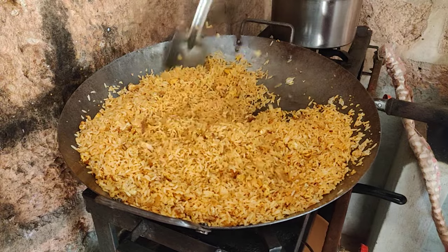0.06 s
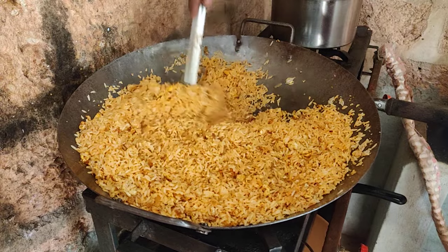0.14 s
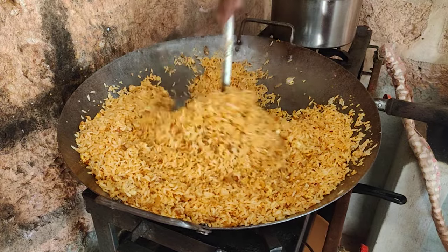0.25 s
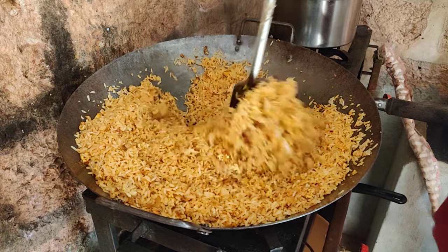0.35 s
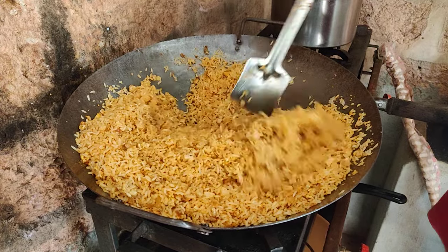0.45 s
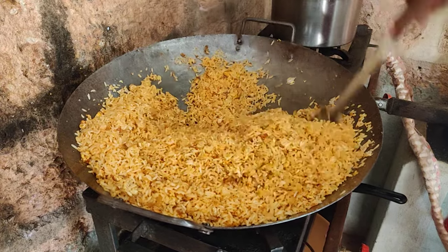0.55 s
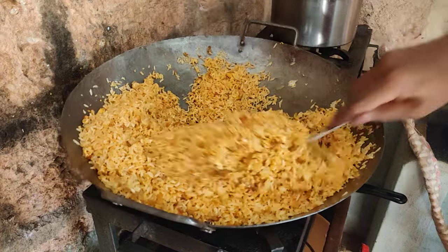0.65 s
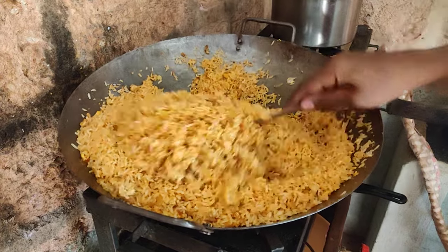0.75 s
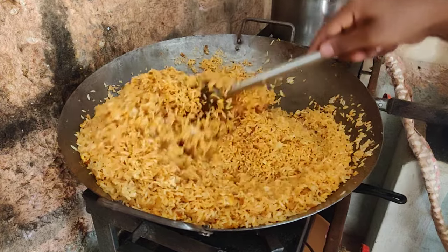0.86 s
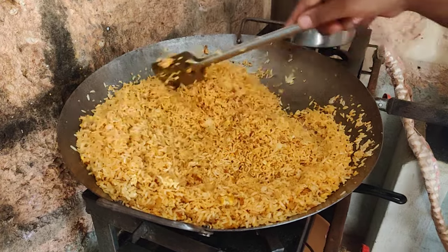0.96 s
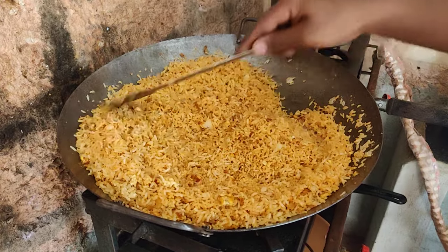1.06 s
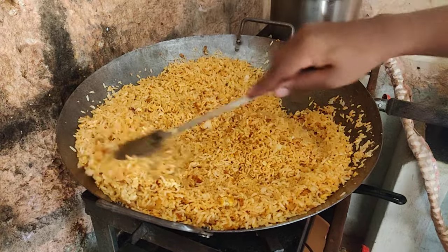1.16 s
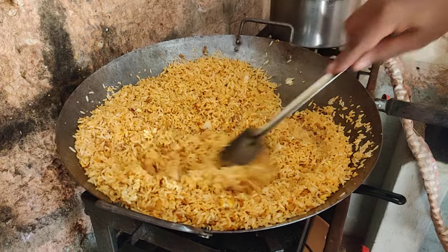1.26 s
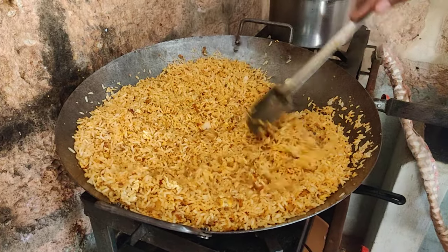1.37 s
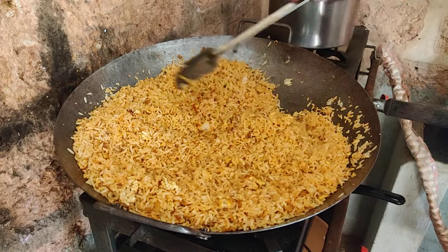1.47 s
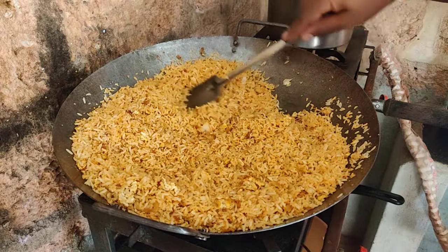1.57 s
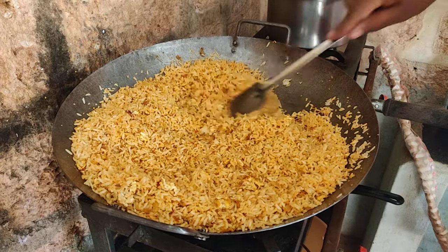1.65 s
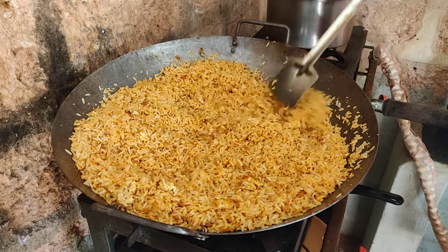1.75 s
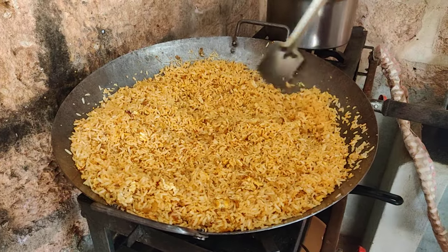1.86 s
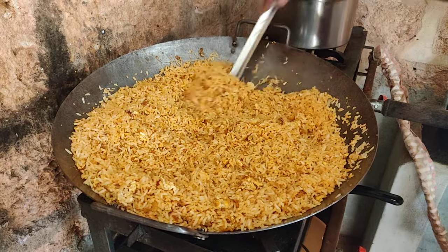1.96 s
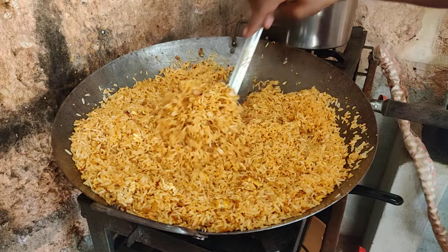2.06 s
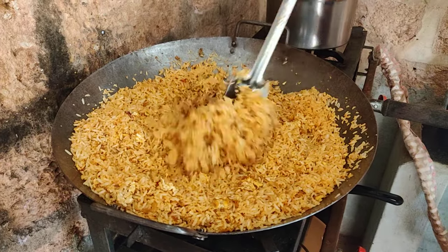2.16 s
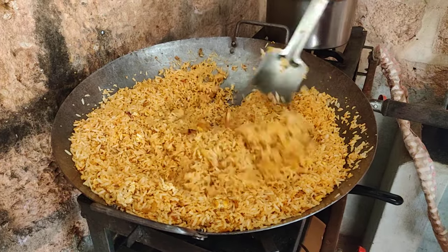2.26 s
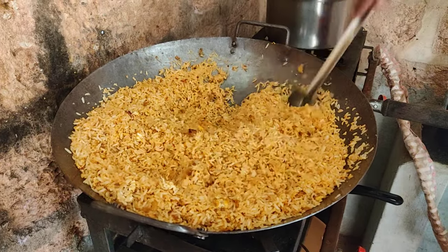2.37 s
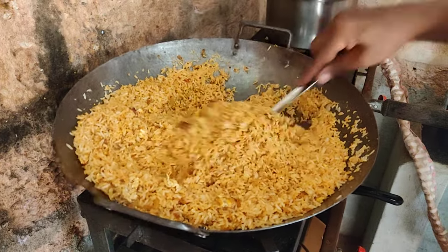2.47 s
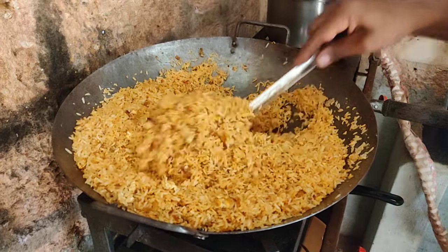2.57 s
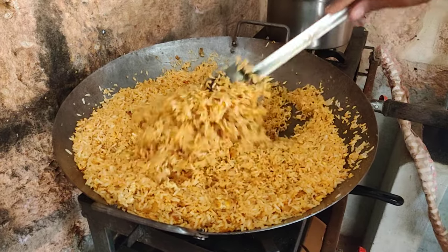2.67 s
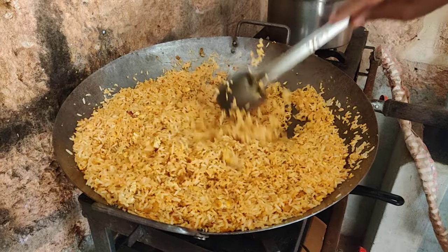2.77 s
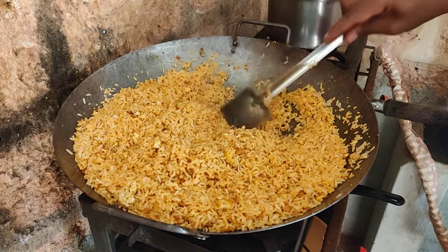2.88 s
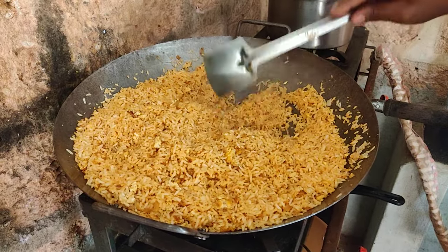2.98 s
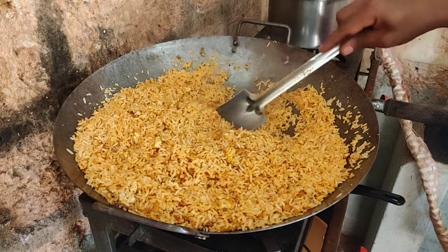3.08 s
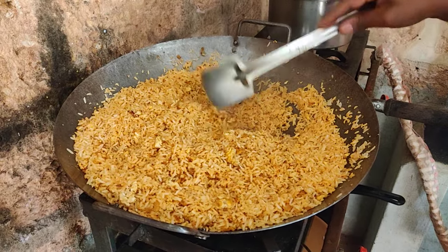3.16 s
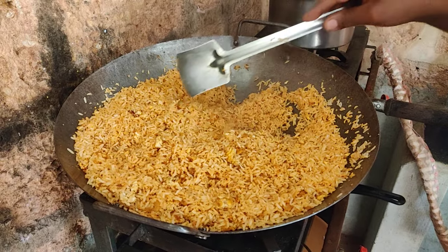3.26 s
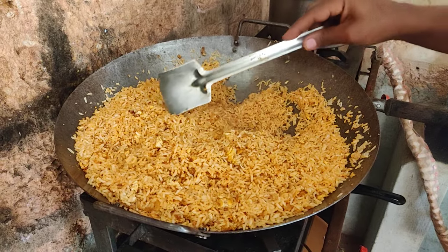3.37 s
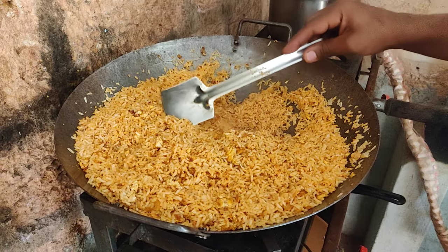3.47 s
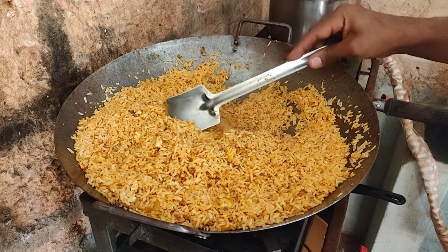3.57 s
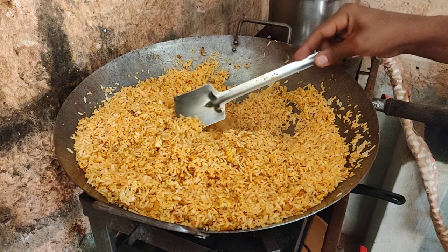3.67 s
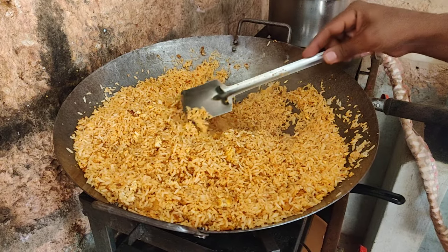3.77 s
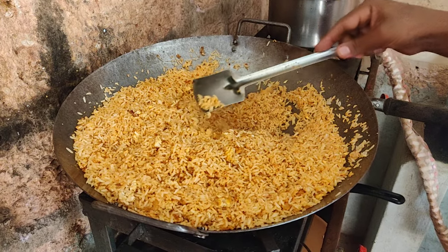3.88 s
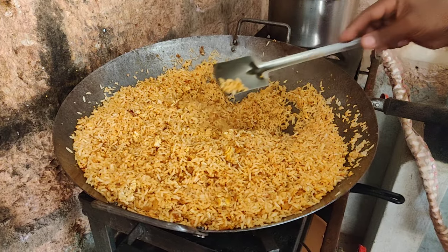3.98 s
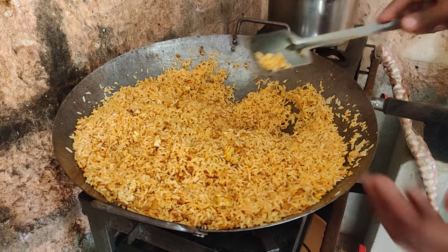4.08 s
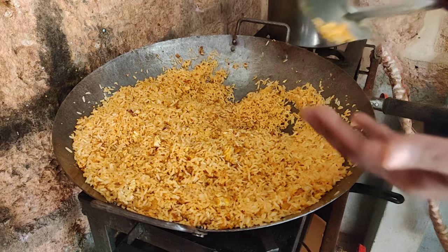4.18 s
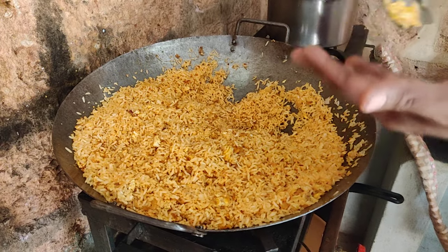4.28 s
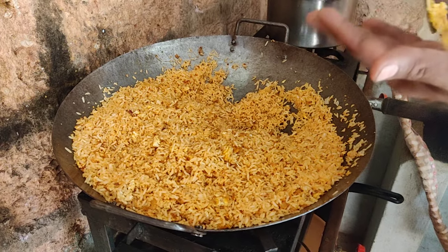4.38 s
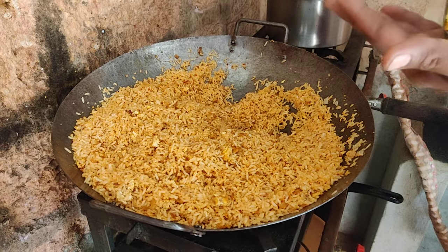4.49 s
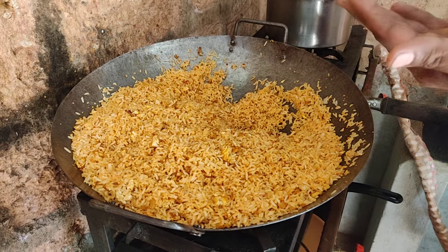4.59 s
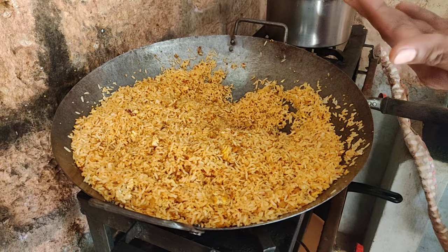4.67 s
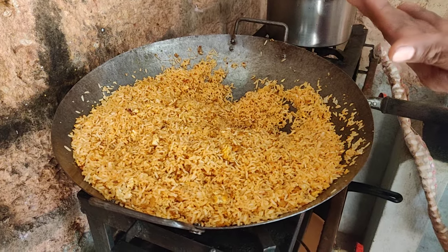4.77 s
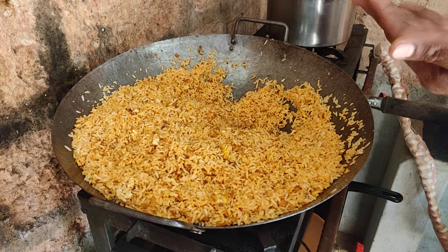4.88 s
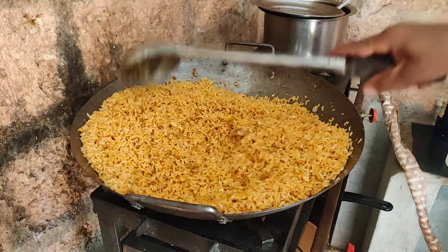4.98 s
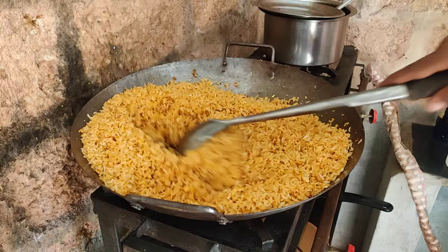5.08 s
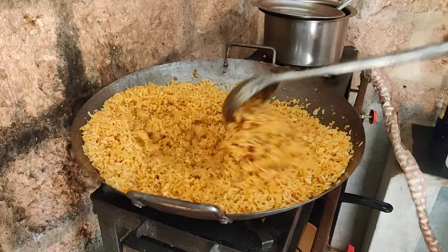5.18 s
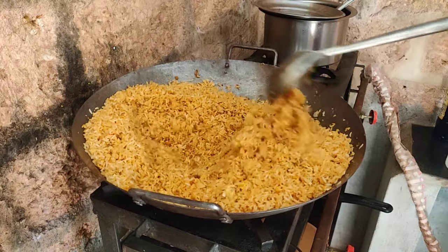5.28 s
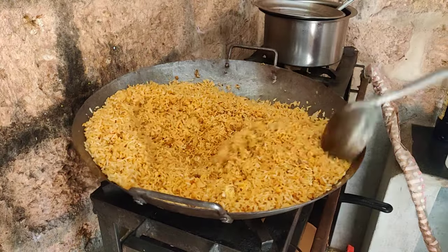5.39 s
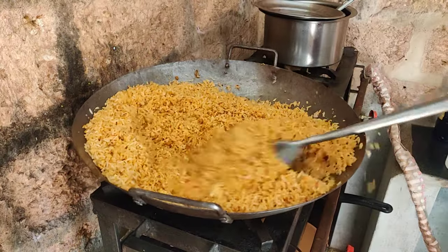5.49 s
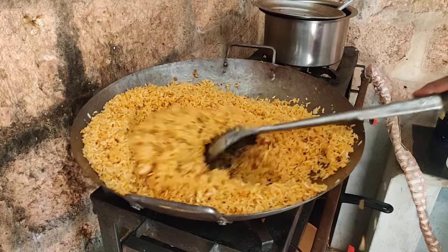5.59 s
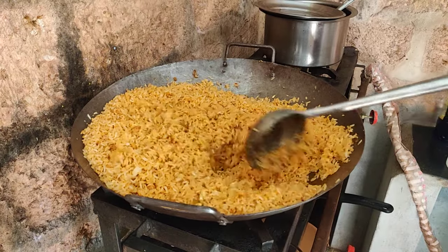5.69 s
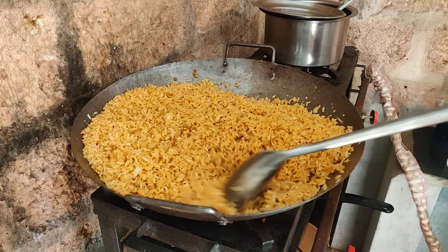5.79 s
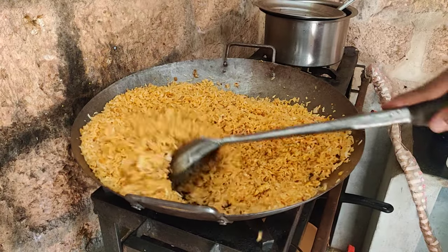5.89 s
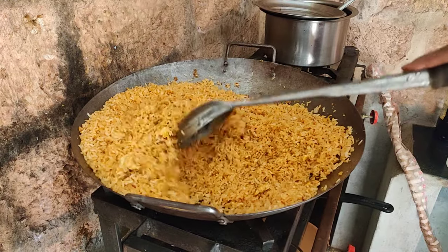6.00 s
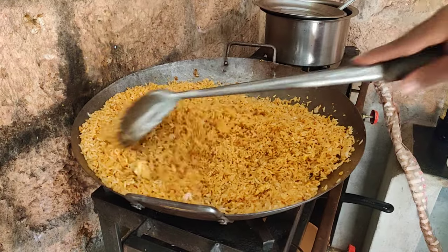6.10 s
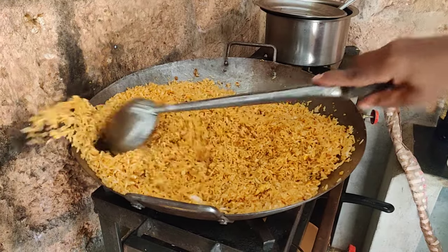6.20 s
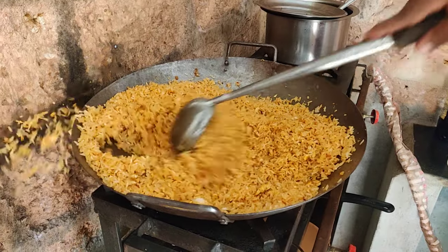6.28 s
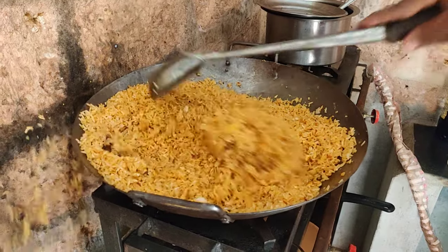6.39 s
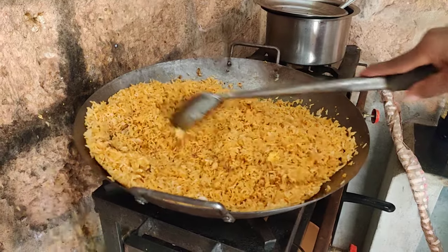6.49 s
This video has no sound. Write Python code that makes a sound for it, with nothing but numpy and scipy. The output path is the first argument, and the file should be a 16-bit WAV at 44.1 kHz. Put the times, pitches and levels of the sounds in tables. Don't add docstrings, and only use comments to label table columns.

```python
import sys
import numpy as np
from scipy import signal
from scipy.fft import rfft, irfft, dct, next_fast_len
from scipy.io import wavfile
from scipy.ndimage import uniform_filter1d

SR = 44100
rng = np.random.default_rng(int(sys.argv[2]) if len(sys.argv) > 2 else 0)


def ratio_of_db(decibels):
    return 10 ** (np.asarray(decibels, float) / 20)


def generate_wav(signal):
    frames = np.transpose(np.atleast_2d(signal))
    scaled = np.clip(frames, -1, 1) * 32767
    pcm = np.round(scaled).astype(np.int16)
    wavfile.write(sys.argv[1], SR, pcm)


N = 288582
TIME = np.arange(N) / SR
FAST = next_fast_len(N)
CUT_S = 4.744

# [pitch_hz, level_db, t60_s]
BOOM_FAR = [(110.3, 0.5, 0.45), (206.9, -1, 0.33), (246.7, -0.5, 0.19), (274, -6, 0.48),
            (289.3, 1.5, 0.092), (412, -15.5, 0.33)]
BOOM_NEAR = [(108.6, -1.5, 0.4), (156, -29, 0.067), (209.3, -3.5, 0.21), (240.3, 3, 0.077),
             (272.7, -0.5, 0.14), (296.4, -3.5, 0.16), (406, -15, 0.38)]
# [pitch_hz, level_db, t60_s]
BODY = [(567, -11, .07), (657, -7, .07), (727, -12, .06), (815, -10, .06), (880, -12, .05),
        (1040, -13, .05)]
# [start_s, pitch_hz, level_db, t60_s]
BLOW_TONES = [(.66, 129, -19.5, 2.1), (2.45, 129, -38, 1), (5.23, 1583, -32, .66), (5.23, 1879, -27, .6),
                  (5.23, 2379, -32, .28), (5.23, 2875, -24, .15), (5.23, 3270, -20, .12), (5.23, 1179, -38, .4),
                  (5.613, 1100, -3, .09), (5.613, 1270, -13, .14), (5.613, 2159, -22, .18), (5.613, 1028, -20, .25),
                  (5.7, 410, -38, 1), (5.7, 240, -36, 1), (6.017, 1583, -33, .6), (6.305, 2450, -24, .15),
                  (.503, 700, -25, .12), (.58, 660, -14, .15), (.58, 860, -19, .12), (.614, 650, -16, .15),
              (.738, 670, -20, .12), (.792, 800, -30, .1), (2.311, 720, -18, .09), (2.394, 670, -14, .12),
              (2.438, 650, -13, .11), (2.55, 800, -27, .1), (2.612, 700, -30, .1), (2.68, 690, -16, .1),
              (4.796, 800, -32, .1), (4.871, 900, -22, .12), (5.103, 750, -24, .15), (5.181, 700, -34, .1),
              (5.324, 640, -15, .15), (5.358, 590, -20, .25), (5.457, 780, -26, .12), (5.494, 880, -23, .1),
              (6.065, 800, -27, .12), (6.326, 800, -18, .12), (6.357, 740, -22, .12), (6.39, 275, -18, .7),
              (.76, 290, -22, .4), (5.635, 400, -18, .25), (5.7, 204, -27, .6), (6.45, 390, -28, .2),
              (6.025, 350, -17, .2), (6.306, 412, -16, .25), (2.7, 400, -26, .2), (6.32, 108, -14, .7),
              (6.07, 105, -20, .4), (6.04, 200, -24, .3), (6.306, 620, -21, .15), (5.23, 760, -20, .14),
              (5.292, 990, -19, .1), (5.25, 1170, -22, .08), (6.305, 2520, -21, .06), (4.871, 2450, -23, .05)]
# [start_s, clank_db, boom_db, body_db, blade_ring_db]
BLOWS_FAR = [(0.3935, -5.5, -23, -34, 7), (0.5042, -39, -28, -21, -14), (0.579, -22.5, -19, -21.5, -6),
             (0.6497, -35, -15, -12.5, 6), (0.705, -29, -26, -31, 2), (0.7388, -35, -35, -25.5, -11),
             (0.8004, -24, -44, -25, -27), (1.4525, -25, -58, -35, -12), (1.729, -23.5, -35, -49, -24),
             (1.821, -19.5, -57, -59, 8), (1.8575, -26, -50, -40, -5), (1.8839, -36, -34.5, -32, -6),
             (2.203, -28, -50, -61, 9), (2.232, -34, -46, -60, 8), (2.2731, -20, -39, -28.5, 9.5),
             (2.3112, -25.5, -31, -19.5, 6), (2.3291, -26.5, -18, -23, 6), (2.395, -17, -18, -23, -12.5),
             (2.438, -30, -18, -28, -2), (2.55, -30, -19.5, -34, -7), (2.68, -3, -17, -8.5, 4.5),
             (2.9016, -3, -18.5, -14.5, 1.5)]
BLOWS_NEAR = [(4.871, -4.5, -8, -19.5, -18), (5.1032, -31.5, -29, -27.5, -19), (5.2297, -5, -24.5, -9.5, 2),
              (5.291, -13, -37, -26, -32), (5.326, -18, -32, -28, -10), (5.454, -51, -51, -41, -8),
              (5.495, -31, -24, -26, -5.5), (5.6135, -3.5, -12.5, -7, -6), (6.017, -18, -27, -24, -17),
              (6.065, -41, -46, -35, -15), (6.305, -6, -8.5, -24, -4.5), (6.3629, -26, -17.5, -22, -3)]
BLOWS = np.array(BLOWS_FAR + BLOWS_NEAR)
# [start_s, hold_s, boom_db, body_db, pitch_hz]
HEAVES = [(-.04, 0.034, -34, -55, 1120), (0.493, 0.029, -23, -41, 680), (0.569, 0.063, -11.5, -28.5, 650),
          (0.727, 0.17, -34.5, -48.5, 656), (1.105, 0.041, -38, -47, 830), (1.775, 0.2, -36.5, -52, 910),
          (2.298, 0.084, -14.5, -32, 696), (2.412, 0.027, -14.5, -31, 664), (2.507, 0.039, -19, -37, 727),
          (2.692, 0.064, -35, -41.5, 680), (2.909, 0.052, -31.5, -45.5, 770), (4.716, 0.14, -26, -37, 960),
          (4.864, 0.068, -20, -41, 980), (5.096, 0.016, -16.5, -40, 706), (5.229, 0.019, -12, -23.5, 1200),
          (5.306, 0.059, -26, -36.5, 870), (5.43, 0.1, -16, -38, 848), (5.601, 0.033, -17.5, -32, 990),
          (5.77, 0.2, -34.5, -71, 750), (6.005, 0.049, -17, -36, 830), (6.304, 0.015, -11.5, -23, 836),
          (6.45, .1, -30, -58, 745)]
# [level_against_blow_db, fall_db_per_s]
JUDDER = [
    (2.5, 187),
    (-13, 372),
    (-1.5, 902),
]
# [start_s, length_s, from_hz, to_hz, level_db]
SCOOPS = [
    (5.24, 0.134, 1370, 520, -25),
    (5.235, 0.156, 2160, 700, -28),
    (5.63, 0.12, 1290, 900, -31),
    (4.9, 0.06, 790, 930, -35),
    (1.87, 0.13, 820, 580, -41.5),
]
# [start_s, length_s, pitch_hz, level_db]
HUMS = [(.402, 0.025, 242, -21.5), (.568, 0.0098, 226, -15), (.641, 0.038, 231, -10),
        (.694, 0.023, 266.6, -9.5), (.755, .03, 270, -24), (2.333, .013, 247, -12), (2.372, .011, 262, -17),
        (2.403, .009, 253, -14), (2.432, 0.014, 265, -10), (2.454, .014, 228, -8), (2.482, 0.008, 245, -14),
        (2.507, .007, 222, -13), (2.558, 0.012, 216, -13), (2.574, .011, 228, -14), (2.609, .008, 252, -20),
        (2.691, 0.012, 236, -18), (2.715, 0.0093, 246, -18.5), (2.901, 0.025, 233, -19.5),
        (2.937, 0.0064, 258, -17), (4.87, .023, 243, -10), (4.902, .01, 249, -12), (4.922, 0.01, 253, -16),
        (5.238, 0.01, 225, -14), (5.27, 0.019, 228, -19), (5.305, 0.038, 250, -19), (5.491, 0.02, 229, -22),
        (5.557, .01, 242, -19), (5.622, .028, 216, -11), (6.068, 0.019, 230, -19.5),
        (6.306, 0.039, 256.5, -4.5), (6.364, 0.022, 265, -3.5), (6.394, 0.006, 264, -12),
        (6.411, 0.0065, 247, -16), (0.782, .008, 257, -19), (5.113, 0.027, 246, -22.5),
        (5.361, .01, 268, -22), (6.098, 0.063, 203.5, -25.5), (4.89, .09, 81, -23), (6.039, .08, 81.8, -29),
        (6.339, .12, 81.4, -22.5)]
# [start_s, pitch_hz, level_db]
CRACKS = [(0.579, 900, -16), (.739, 920, -29), (2.3112, 900, -13), (2.395, 900, -12), (2.44, 800, -17),
          (2.68, 1200, -11), (4.8707, 1300, -19), (5.103, 990, -26), (5.2293, 1260, -1),
          (5.6127, 1160, -3.5), (6.3046, 980, -9)]
# [pitch_hz, level_db, t60_s]
BLADE = [(3190, -3, .09), (3285, 0, .1), (3431, 0, .1), (3540, -1, .08), (3655, 1, .11), (3770, 0, .09),
         (3870, -3, .08), (4270, -10, .04), (5900, -10, .04)]
# [pitch_hz, level_db_per_hz]
CLANK = [(400, -6.5), (900, -3.5), (1300, 2), (2000, -14.5), (2650, -13.5), (3300, 9), (3950, 7),
         (4600, 2.5), (6600, -2), (7950, -13), (15200, -40), (15900, -22), (16500, -54)]
# [start_s, hold_s, level_db]
SCRAPES = [(-.04, 0.083, -24), (0.134, 0.035, -35.5), (0.382, 0.18, -22), (0.663, 0.027, -43),
           (1.0, 0.24, -46), (1.445, 0.48, -51), (1.797, 0.04, -23.5), (2.092, 0.14, -54.5),
           (2.243, 0.031, -20), (2.41, 0.1, -35), (2.68, 0.0044, -23.5), (2.908, 0.055, -33.5),
           (4.71, 0.26, -31), (5.02, 0.19, -38.5), (5.276, 0.065, -19), (5.42, 0.16, -34),
           (5.63, 0.26, -33), (6, 0.12, -27), (6.288, 0.042, -20.5), (6.452, .1, -45)]
# [pitch_hz, level_db_per_hz]
SCRAPE = [(710, -55), (1200, -13), (1900, -17), (2080, -11.5), (3750, -3), (5100, -8.5), (5630, -6),
          (8360, -25.5), (15300, -20), (16000, -12), (16500, -41)]
# [time_s, level_db]
SIZZLE = [(0, -35), (.16, -41), (.57, -36), (.85, -38.5), (1.4, -40.5), (1.56, -39.5), (1.76, -45),
          (2.4, -37.5), (2.6, -35), (2.852, -44.5), (3.85, -44), (4.73, -45), (4.75, -36), (5.1, -39),
          (6.2, -38), (6.54, -42)]
# [start_s, level_db]
SPITS = [(0.164, -17.5), (0.955, -20.5), (1.1187, -25), (1.385, -38), (1.774, -16), (1.857, -13),
         (1.97, -20.5), (2.066, -19), (2.148, -27), (2.129, -24), (3.213, -28), (3.236, -32), (3.4, -25),
         (3.485, -27.5), (3.523, -21), (3.6242, -46), (3.7577, -23.5), (3.778, -20.5), (3.8387, -21),
         (3.9277, -21.5), (3.985, -28), (4.021, -22), (4.0549, -15), (4.1, -22.5), (4.247, -17.5),
         (4.3231, -18.5), (4.497, -20.5), (4.5355, -16), (4.637, -20), (4.6636, -24), (5.89, -17.5),
         (6.465, -32)]
# [pitch_hz, level_db]
SPIT_TILT = [(300, -5.5), (1000, 2), (6000, -0.5), (9000, -4), (16000, -5)]
# [pitch_hz, level_db_per_hz]
FRY = [(88, -18), (150, -7), (227, -9), (409, -8.5), (434, -12), (460, -9), (864, -7), (1410, -9.5),
       (3230, -6.5), (3560, -8), (5930, -11.5), (8130, -22), (15300, -19.5), (16500, -4.5)]
# [pitch_hz, likeness_share]
FRY_SAME = [(60, 0.31), (180, 0.8), (550, 0.74), (1650, 0.3), (4970, -0.12), (15000, -0.11)]
# [pitch_hz, balance_db]
FRY_LEAN = [(60, 11), (95, 26), (150, -2), (240, 1), (380, 0), (600, 3), (950, -1), (1500, 5.5), (2380, 3),
            (3770, 0), (5980, 26), (9470, -1.5), (15000, 6.5)]
# [start_s, level_db, contact_s]
TAPS = [
    (4.574, -22.5, 0.0007),
    (4.683, -5.5, 0.00025),
]
# [pitch_hz, level_db, t60_s]
DRONE_FAR = [(69, -19, 0.049), (85.5, 4, 0.14), (117.2, 1.5, 0.31)]
DRONE_NEAR = [(82, -1.1, 0.83), (115.7, 0.44, 0.55), (137.1, 0.63, 0.47)]
# [far_db, near_db]
DRONE_REST = (-56.5, -35.5)
DEEP_REST = (-56, -59)
DRONE_SHAKE = (-10.5, -12.5)
DEEP_SHAKE = (-44, -48)
# [multiple, level_db]
IDLE = [(1, -36), (2, -33), (4, -31.5), (5, -38), (6, -35)]
# [pitch_hz, balance_db]
LEAN_FAR = [(60, 8), (95, 1), (150, 2.5), (240, 1), (380, -1), (600, 0.5), (950, -1), (1500, 3.5),
            (2380, -2), (4400, 4.5), (6200, 12), (9470, 0), (15000, 2.5)]
LEAN_NEAR = [(60, 5), (95, 0), (150, 5), (240, -0.5), (380, 0), (600, -0.5), (950, -0.5), (1500, 1.5),
             (2380, -2.5), (4600, 0), (6500, 12), (9470, -4), (15000, 1.5)]
# [pitch_hz, share_of_neighbouring_power]
GATE = [(1500, 0), (2200, .42), (3000, .5), (4500, .4), (6000, .28), (7200, .4), (8400, .64), (9600, .77),
        (13500, .68), (15500, .6)]


def pan():
    push = force(column=1, modes=BOOM_NEAR, knock_db=-5.0, rub_db=-8.0, rattle_t60=0.2, fall_db=129)
    boom = np.where(TIME < CUT_S, ring(push, BOOM_FAR), ring(push * (TIME > CUT_S), BOOM_NEAR))
    stir = force(column=2, modes=BODY, knock_db=-11.5, rub_db=-11, rattle_t60=0.2, fall_db=146)
    end_hz, sink_s, width_hz = 620, 0.05, 200
    current = np.searchsorted([row[0] for row in HEAVES], TIME) - 1
    start, _, _, _, first_hz = np.transpose(HEAVES)[:, current]
    sinking = end_hz + (first_hz - end_hz) * np.exp(-((TIME - start) / sink_s) ** 2)
    turn = np.exp(2j * np.pi * np.cumsum(sinking) / SR)
    r = np.exp(-np.pi * width_hz / SR)
    hollow = (turn * signal.lfilter([1], [1, -r], stir / turn)).real
    out = boom + ring(stir, BODY) + ratio_of_db(15) * hollow + ratio_of_db(21) * band(stir, 450, 2000)
    t = TIME[:2 * SR]
    for s, hz, db, t60 in BLOW_TONES:
        onset = 1 - np.exp(-t * hz / 2)
        add(out, s, ratio_of_db(db - 60 * t / t60) * np.sin(2 * np.pi * hz * t) * onset)
    return band(out, 150, 5700)


def force(column, modes, knock_db, rub_db, rattle_t60, fall_db):
    rub = rng.standard_normal(N) * lumps(per_s=80, db=2.5)
    effort = heave(column + 1, fall_db) + judder(column - 1, column + 1)
    rub *= effort * ratio_of_db(rub_db) / ring(rub, modes).std()
    t = TIME[:3000]
    for row, shake in zip(BLOWS, rng.standard_normal((len(BLOWS), len(t)))):
        knock = (t == 0) + 0.041 * shake * ratio_of_db(-60 * t / rattle_t60)
        add(rub, row[0], ratio_of_db(row[column + 1] + knock_db) * knock)
    return rub


def heave(column, fall_db):
    rows = np.transpose(HEAVES)
    return strokes(rows[0], rows[1], rows[column], 0.033, fall_db)


def judder(layer, column):
    db, fall_db = JUDDER[layer]
    return strokes(BLOWS[:, 0], 0, BLOWS[:, column] + db, 1 / 1000, fall_db)


def strokes(start, hold, db, rise_s, fall_db):
    t = TIME[::32]
    since = t - np.reshape(start, (-1, 1))
    end = rise_s + abs(np.reshape(hold, (-1, 1)))
    release = ratio_of_db(np.reshape(db, (-1, 1)) - fall_db * np.maximum(since - end, 0))
    shape = np.clip(since / rise_s, 0, 1) * release
    same_view = (t > CUT_S) == (t - since + end > CUT_S)
    return np.interp(TIME, t, (shape * same_view).sum(0))


def scoops():
    out = np.zeros(N)
    rub = rng.standard_normal(N) * lumps(per_s=70, db=1.5)
    width_hz = 110
    r = np.exp(-np.pi * width_hz / SR)
    for s, length, from_hz, to_hz, db in SCOOPS:
        u = TIME[:round(length * SR)] / length
        sliding = to_hz + (from_hz - to_hz) * (1 - u) ** 1.33
        turn = np.exp(2j * np.pi * np.cumsum(sliding) / SR)
        piece = rub[round(s * SR):][:len(u)]
        tone = (turn * signal.lfilter([1], [1, -r], piece / turn)).real
        add(out, s, ratio_of_db(db) * np.sqrt(np.sin(np.pi * u)) * evened(tone))
    return out


def contacts():
    out = np.zeros(N)
    edge_s = 0.00796
    for s, length, hz, db in HUMS:
        t = TIME[:round((length + edge_s) * SR)]
        swell = np.sin(np.pi / 2 * np.clip(np.minimum(t, t[-1] - t) / edge_s, 0, 1)) ** 2
        add(out, s - edge_s / 2, ratio_of_db(db) * swell * np.sin(2 * np.pi * hz * t))
    for s, hz, db in CRACKS:
        turn = 2 * np.pi * hz * TIME[:round(SR / hz)]
        add(out, s, -ratio_of_db(db) * np.sin(turn) * np.sin(turn / 2) * 1.1)
    return out


def clanks():
    cloud, blade, t = np.zeros((2, N)), np.zeros((2, N)), TIME[:16000]
    hz, mode_db, t60 = np.transpose(BLADE)[:, :, None]
    apart = 1.2
    shakes = rng.standard_normal((len(BLOWS), 3, len(t)))
    shakes = (shakes[:, :1] + apart * shakes[:, 1:]) / np.sqrt(1 + apart ** 2)
    spots = rng.standard_normal((len(BLOWS), 3, len(BLADE), 1))
    for (s, db, _, _, ring_db), shake, (shift, weight, phase) in zip(BLOWS, shakes, spots):
        side = ratio_of_db(db) * (1 - np.exp(-t / 0.0004))
        lasting = 0.21 * ratio_of_db(0.072 * db)
        add(cloud, s, side * shake * (ratio_of_db(-60 * t / lasting) + 4.1 * ratio_of_db(-60 * t / 0.017)))
        decay = ratio_of_db(mode_db + 2 * weight - 60 * t / (t60 * ratio_of_db(.2 * db - 1)))
        modes = decay * np.sin(2 * np.pi * (hz * (1 + .012 * shift) * t + phase))
        add(blade, s, side * ratio_of_db(ring_db) * modes.sum(0))
    scale = colour(rng.standard_normal(N), CLANK).std()
    return ratio_of_db(-14.0) * colour(cloud, CLANK) / scale + ratio_of_db(-12.5) * blade


def scrape():
    ticks = rng.standard_normal(N) + rng.standard_normal((2, N))
    ticks = ticks * ratio_of_db(2.7 * rng.exponential(1, N) * .5) * lumps(per_s=220, db=-1.5)
    edge = evened(colour(ticks, SCRAPE))
    drag = strokes(*np.transpose(SCRAPES), rise_s=0.022, fall_db=169) + judder(layer=2, column=1)
    return ratio_of_db(-8.5) * drag * edge


def sizzle():
    hz = np.fft.rfftfreq(FAST, 1 / SR)
    s, db = np.transpose(SIZZLE)
    level = ratio_of_db(np.interp(TIME, s, db) + 1.0) * lumps(per_s=20, db=1.52) * lumps(per_s=150, db=0.6)
    pops = ratio_of_db(2.7 * np.minimum(rng.exponential(1, N), 5)) * (rng.random(N) < 300 / SR)
    bursts = 0.97 * level * signal.lfilter([1], [1, -.97], pops)
    spit_t60_s = 0.052
    for s, db in SPITS:
        add(bursts, s, ratio_of_db(db - 11.5 - 60 * TIME[:6000] / spit_t60_s))
    noise = rng.standard_normal((2, 2, N))
    a, b = rfft(noise[0] * level, FAST) + rfft(noise[1] * bursts, FAST) * ratio_of_db(read(SPIT_TILT, hz))
    same = np.clip(read(FRY_SAME, hz), -1, 1)
    tone = ratio_of_db(read(FRY, hz))
    pair = np.array([a, same * a + np.sqrt(1 - same ** 2) * b]) * tone
    lean = ratio_of_db(read(FRY_LEAN, hz) * np.array([[.5], [-.5]]))
    return irfft(pair * lean, FAST)[:, :N] / np.sqrt(np.mean(tone ** 2)) * np.sqrt(2)


def taps():
    out, t = np.zeros(N), TIME[:2000]
    for s, db, contact in TAPS:
        push = t / contact * np.exp(1 - t / contact)
        recoil = 0.34 * t / 0.0024 * np.exp(1 - t / 0.0015)
        add(out, s, ratio_of_db(db) * (push - recoil))
    return np.where(TIME < 4.63, band(out, 120, 500), out)


def rumble():
    view = (TIME > CUT_S) * 1
    shake = heave(column=2, fall_db=155) + ratio_of_db(-30) * heave(column=2, fall_db=35)
    a, b = rng.standard_normal((2, N))
    drone = np.where(TIME < CUT_S, evened(ring(a, DRONE_FAR)), evened(ring(a, DRONE_NEAR)))
    drone = band(drone, 78.0, 130.2)
    deep = evened(band(b, 11, 95) + 0.00079 * (TIME > CUT_S) * ring(b, [(40.5, 0, 0.5)]))
    drone_gain = ratio_of_db(DRONE_REST)[view] + ratio_of_db(DRONE_SHAKE)[view] * shake
    deep_gain = ratio_of_db(DEEP_REST)[view] + ratio_of_db(DEEP_SHAKE)[view] * shake
    return drone_gain * drone + deep_gain * deep


def engine():
    idle_hz, hold_s, fall_db_per_s, left_db = 39.6, 0.42, 26, -10
    fade_db = np.maximum(-fall_db_per_s * np.maximum(TIME - CUT_S - hold_s, 0), left_db)
    turns = np.cumsum(idle_hz * lumps(per_s=4, db=.04)) / SR
    orders = sum(ratio_of_db(db) * np.sin(2 * np.pi * round(k) * turns) for k, db in IDLE)
    return (TIME > CUT_S) * ratio_of_db(fade_db) * orders


def stall(x):
    at = np.arange(20, 4000, 20) + rng.integers(0, 20, (3, 2, 199))
    tail = np.zeros((3, 2, 4100))
    echoes = rng.choice([-1., 1.], at.shape) * ratio_of_db(-60 * at / SR / .05)
    np.put_along_axis(tail, at, echoes, 2)
    tail = band(tail, 445, 17350)
    turns_per_s = 4.3
    turns = np.sqrt(2 / 3) * np.cos(np.pi * (turns_per_s * TIME + np.arange(3)[:, None, None] / 3))
    return signal.oaconvolve(x * turns, tail / np.linalg.norm(tail[0, 0]), axes=2)[..., :N].sum(0)


def ports(x, lean, count):
    return np.array([np.roll(colour(x[0], lean, 0.78), -count), colour(x[1], lean, -1.12)])


def gate(x):
    lead, hop = 506, 1024
    frames = N // hop + 3
    window = np.sin(np.pi * (np.arange(2 * hop) + .5) / (2 * hop))
    halves = np.pad(x, ((0, 0), (lead + hop, 3 * hop)))[:, :(frames + 1) * hop].reshape(2, -1, hop)
    lapped = np.concatenate([halves[:, :-1], halves[:, 1:]], 2) * window
    a, b, c, d = np.split(lapped, 4, axis=2)
    z = dct(np.concatenate([-c[..., ::-1] - d, a - b[..., ::-1]], 2), type=4, norm="ortho")
    hz = (np.arange(hop) + .5) * SR / (2 * hop)
    power = (z ** 2).mean(0) + 1e-16
    patch = uniform_filter1d(uniform_filter1d(power, size=10, axis=1), size=2, axis=0)
    local = np.exp(uniform_filter1d(np.log(patch), size=60, axis=1))
    calm = abs(np.gradient(np.log(power[:, 100:].sum(1))))[:, None] < .6
    below = 1. * (patch < read(GATE, hz) * local)
    weak = uniform_filter1d(below, size=10, axis=1) > 1e-6
    muted = (weak | np.roll(weak, -1, axis=0)) & calm
    p, q = np.split(dct(z * ~muted, type=4, norm="ortho"), 2, axis=2)
    back = np.concatenate([q, -q[..., ::-1], -p[..., ::-1], -p], 2) * window
    return (back[:, :-1, hop:] + back[:, 1:, :hop]).reshape(2, -1)[:, lead:lead + N]


def ring(force, modes):
    out = np.zeros(N)
    for hz, db, t60 in modes:
        pole = np.exp(2j * np.pi * hz / SR - np.log(1000) / (t60 * SR))
        out += ratio_of_db(db) * signal.lfilter([1], [1, -pole], force).imag
    return out


def lumps(per_s, db):
    return ratio_of_db(db * evened(uniform_filter1d(rng.standard_normal(N), int(SR / per_s))))


def evened(x):
    return x / np.sqrt(np.mean(x ** 2) + 1e-20)


def read(points, hz):
    f, value = np.transpose(points)
    return np.interp(np.log(hz + 1), np.log(f + 1), value)


def colour(x, points, share=1):
    gain = ratio_of_db(share * read(points, np.fft.rfftfreq(FAST, 1 / SR)))
    return irfft(rfft(x, FAST) * gain, FAST)[..., :N]


def band(x, lo_hz, hi_hz):
    return signal.sosfilt(signal.butter(2, [lo_hz, hi_hz], "bp", fs=SR, output="sos"), x)


def add(mix, s, sound):
    part = mix[..., round(s * SR):][..., :sound.shape[-1]]
    part += sound[..., :part.shape[-1]]


def scene():
    iron = pan() + scoops() + contacts()
    blade = clanks() + scrape()
    steel = iron + blade + stall(ratio_of_db(-5) * iron + ratio_of_db(-6) * blade)
    heard = np.where(TIME < CUT_S, ports(steel, LEAN_FAR, count=3), ports(steel, LEAN_NEAR, count=1))
    return heard + rumble() + engine() + sizzle() + taps()


def roll_off(x):
    return signal.sosfilt(signal.butter(12, 17130, fs=SR, output="sos"), x)


def record(dry):
    edge = signal.firwin(255, 15800, fs=SR)[None]
    limited = .9 * np.tanh(dry / 1.17)
    mix = gate(signal.oaconvolve(limited, edge, "same", axes=1))
    return roll_off(mix)


dry = scene()
out = record(dry)
generate_wav(out)
```